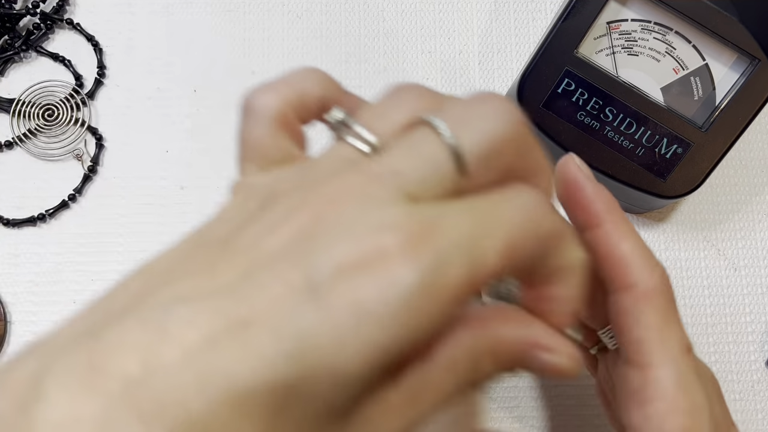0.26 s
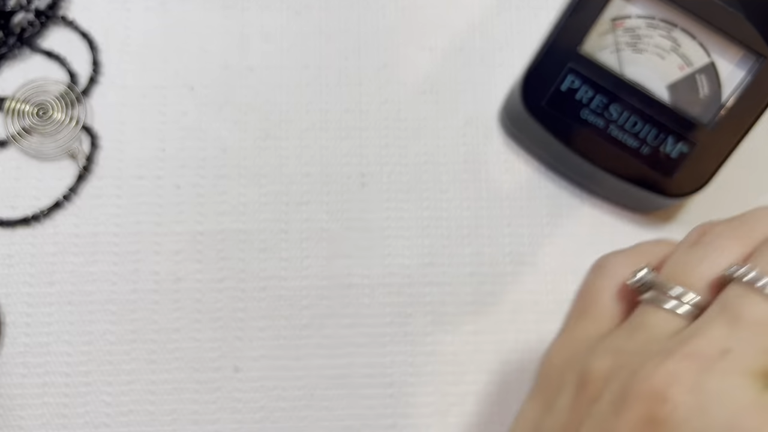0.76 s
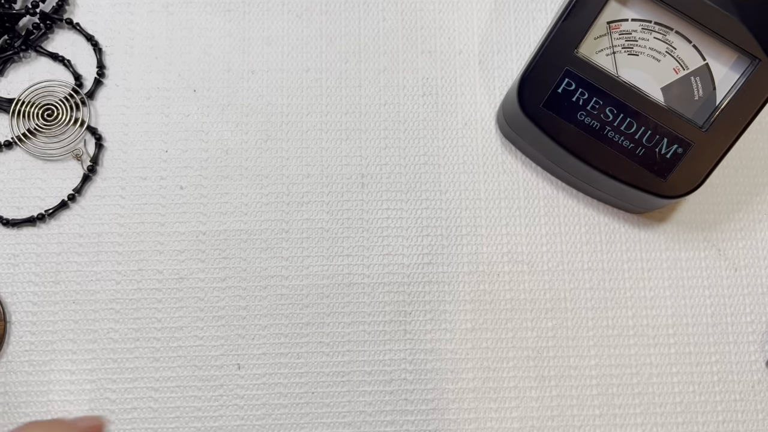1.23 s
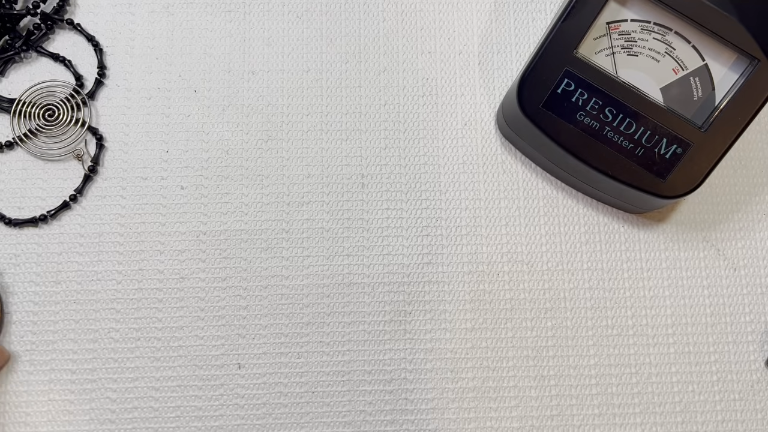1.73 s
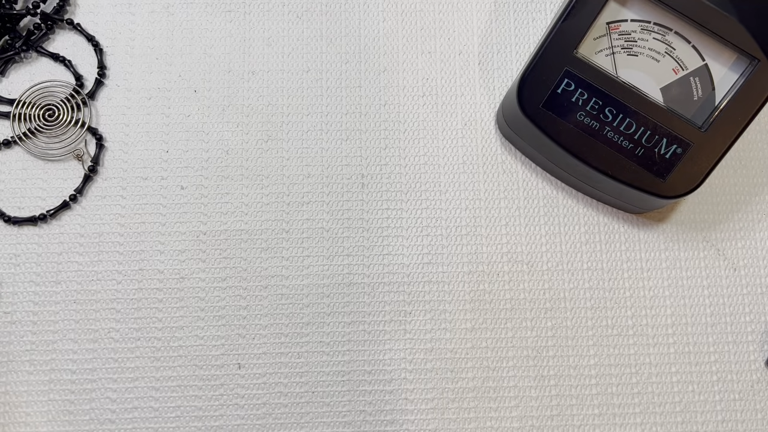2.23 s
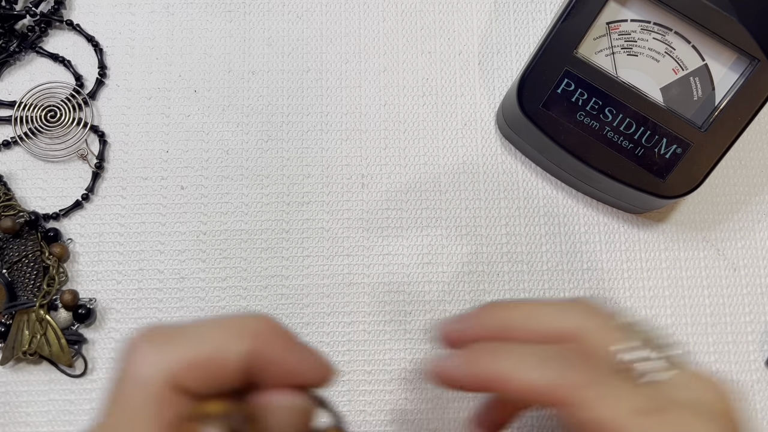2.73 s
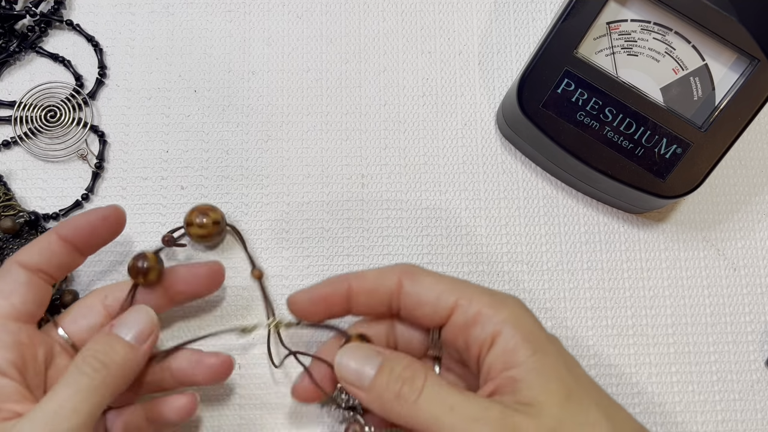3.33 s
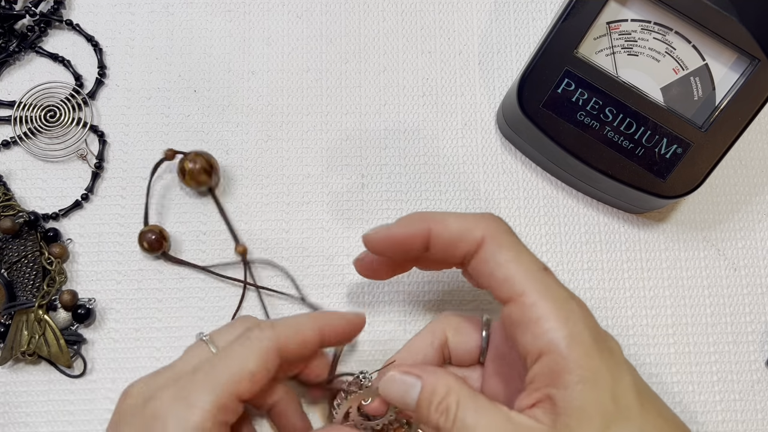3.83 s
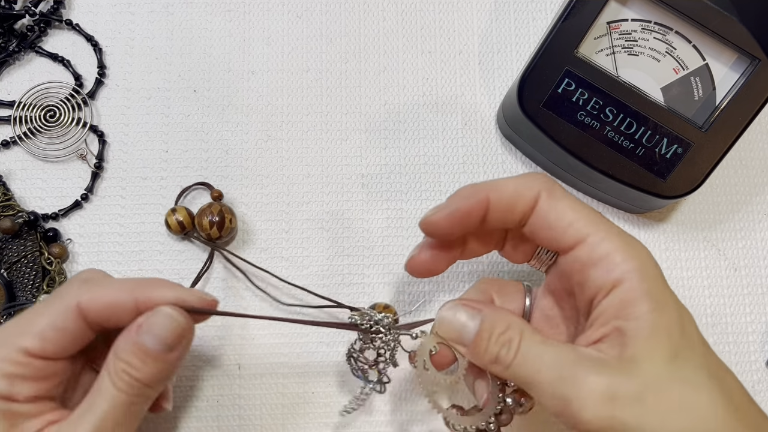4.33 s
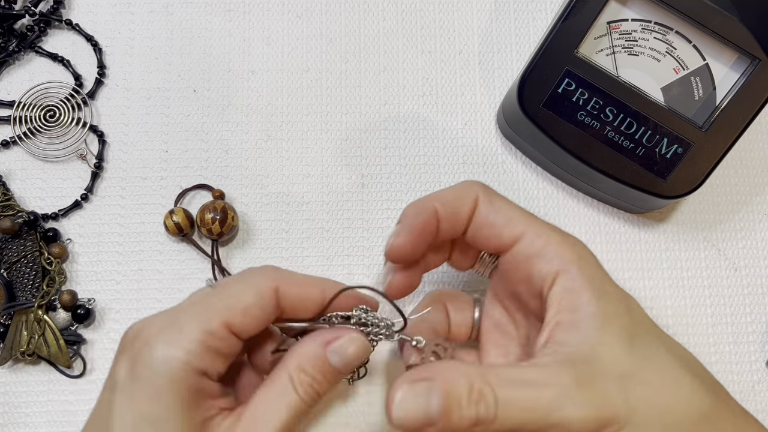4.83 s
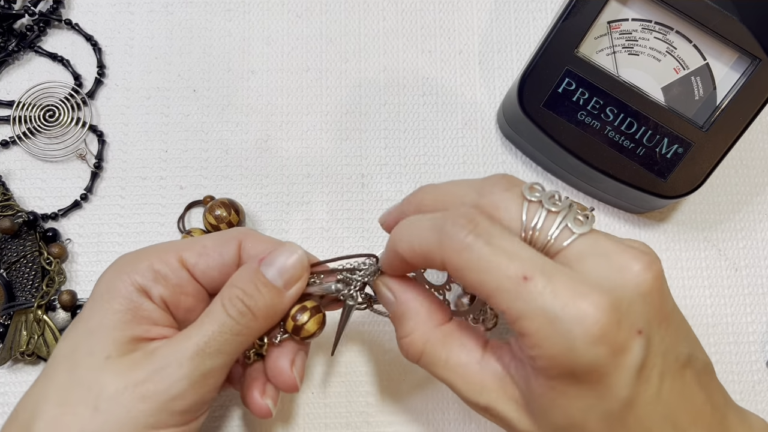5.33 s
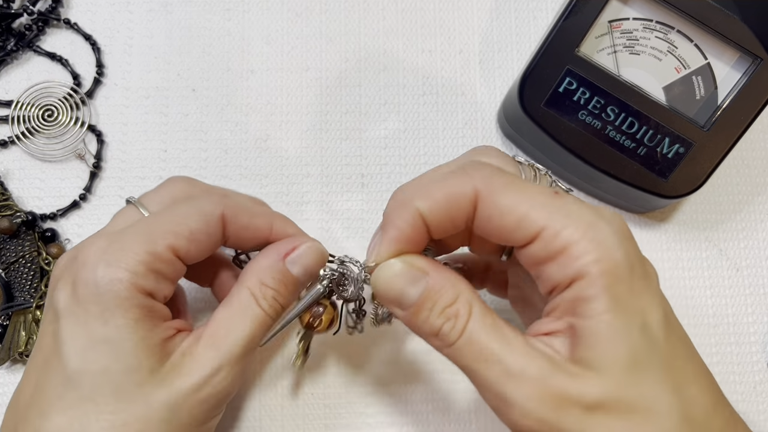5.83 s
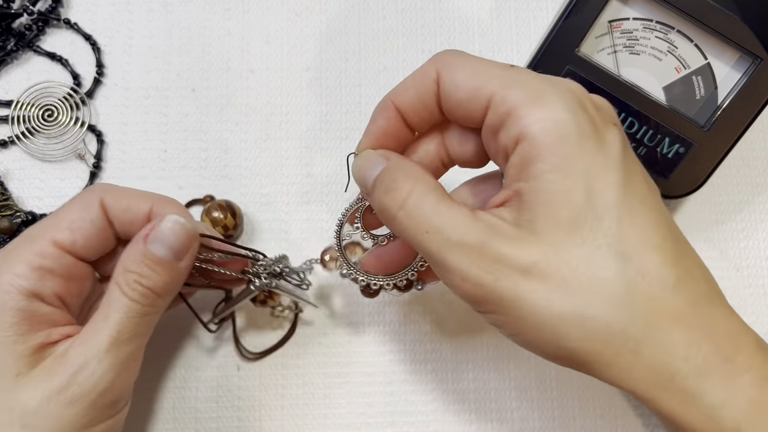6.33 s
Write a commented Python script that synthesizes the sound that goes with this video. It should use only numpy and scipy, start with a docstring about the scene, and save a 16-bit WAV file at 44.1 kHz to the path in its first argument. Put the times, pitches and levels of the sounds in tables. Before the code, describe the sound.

Jewellery chains jingle and rustle on a cloth-covered table, then beads knock and drag, followed by quiet fiddling with faint metallic clinks.

```python
"""A low, wavering drone and soft room noise come first, then jingling links and rustling cloth.
Hands lift a chain necklace away and put it down to one side of a cloth-covered table, heard close up.
A cord necklace with wooden beads is dragged in, and a metal earring is picked out with small clinks.
Noise bursts and fading tones make the blows and clinks; random tiny impacts make the jingling and rubbing.
A short echo, and two microphones that each tint the sound, place it all in a small quiet room."""
import sys
import numpy as np
from scipy import signal
from scipy.fft import rfft, irfft
from scipy.io import wavfile

SR = 44100
rng = np.random.default_rng(int(sys.argv[2]) if len(sys.argv) > 2 else 0)


def dump(signal):
    """Clip the signal to [-1, 1] and save it as 16-bit WAV at the path in sys.argv[1]."""
    limited = np.clip(np.atleast_2d(signal).T, -1, 1)
    pcm = np.round(limited * 32767).astype(np.int16)
    wavfile.write(sys.argv[1], SR, pcm)


N = 289737
TIME = np.arange(N) / SR  # s

# All levels are relative: mixing and the microphones still change them.
# room noise, how much of each pitch: [f/Hz, level/dB]
AIR_SPECTRUM = [(20, -21.5), (45, -2), (65, 0), (110, -6.5), (180, -3), (260, -24), (450, -30),
                (1000, -36.5), (3000, -35), (8000, -42.5), (16000, -50)]
AIR_DB = -66
# rise and fall of the low drone: [t/s, level/dB]
DRONE_LEVEL = [(0.0, -58.5), (0.7, -58.5), (1.3, -68.5), (2.0, -55), (3.4, -69.5), (6.57, -71.5)]
# each move of the hands shakes the links and rubs the cord: [t/s, length/s, jingle level/dB, rustle level/dB]
HAND_MOVES = [(0.129, 0.23, -50, -45.5), (0.326, 0.11, -45.5, -45.5), (0.607, 0.16, -43.5, -53.5),
              (0.864, 0.083, -50.5, -63), (1.188, .02, -53, -59), (1.71, .12, -50.5, -56),
              (1.835, 0.15, -40.5, -40.5), (2.061, 0.01, -49, -45), (2.202, 0.011, -34, -43),
              (2.258, 0.087, -56, -42.5), (2.463, 0.2, -49.5, -40.5), (2.633, 0.087, -43, -40.5),
              (2.764, 0.19, -51.5, -45), (3.004, 0.17, -55, -58.5), (3.29, 0.13, -55, -55.5),
              (3.443, 0.033, -51, -50), (3.58, 0.094, -60, -61), (3.763, .03, -53, -63.5),
              (3.835, 0.2, -51.5, -53), (4.108, 0.073, -58.5, -56), (4.51, 0.033, -63, -55),
              (4.603, 0.093, -62.5, -58), (4.82, 0.22, -58.5, -67.5), (5.158, 0.045, -60.5, -71),
              (5.48, 0.073, -57.5, -65), (5.66, 0.075, -56, -62.5), (5.975, 0.028, -46, -49),
              (6.08, 0.14, -62.5, -62), (6.297, 0.026, -60.5, -64), (6.56, 0.048, -45.5, -43)]
START_S, SETTLE_S = 0.036, 0.049  # time constants of a hand move building up and coming to rest
SLOWING_DB_PER_S = 16  # a movement weakens as it slows
# once the cord necklace is in hand it is never quite still
HELD_S, HELD_JINGLE_DB, HELD_RUSTLE_DB = 1.65, -72.5, -78
# colour of touching chain links: [f/Hz, level/dB]
LINK_SPECTRUM = [(1000, -38.5), (3000, -18.5), (4500, -28.5), (7000, -5.5), (8600, -0.5), (10400, 2.5),
                 (11600, 1), (12400, -1), (13300, -4), (14400, -3), (16000, -12)]
# ringing of charms and hooks: [f/Hz, level/dB, time to fall 60 dB/s]
CHARM_MODES = [(4034, 2, 0.023), (6050, -12.5, .04), (6700, 4, .04), (8230, -2.5, 0.13),
               (9750, -13.5, 0.0377), (12500, -30.5, .04), (11800, -5, 0.048), (14600, -4.5, 0.055),
               (13200, -9.5, .08), (12150, 1, 0.032), (14550, -2.5, .04), (14600, -2, .04)]
# colour of rubbing on cloth: [f/Hz, level/dB]
CLOTH_SPECTRUM = [(300, -17), (900, -16.5), (2000, -8), (3300, -9), (4600, -3.5), (5800, 0), (7200, -0.5),
                  (9000, -7.5), (16000, -20)]
# how long the room's echo lasts at each pitch: [f/Hz, time to fall 60 dB/s]
ROOM_DECAY = [(100, 1), (300, 0.18), (700, 0.19), (1500, 0.2), (4000, 0.083), (9000, 0.1), (16000, 0.061)]
# the heel of a hand slides over the cloth: [t/s, length/s, level/dB]
HAND_SLIDES = [(0.16, .12, -51), (1.8, 0.19, -53.5), (2.17, .04, -51), (2.63, 0.13, -56)]
# the clearest touches of metal on metal: [t/s, level/dB, centre f/Hz, left-right lean/dB before scaling]
METAL_TOUCHES = [(0.1674, -36, 12100, -9), (0.2027, -36, 11200, -4), (0.329, -33, 13600, 0),
                 (0.392, -34.5, 12200, -3), (0.5715, -37.5, 11200, -2), (0.715, -36, 11100, -5),
                 (0.8575, -38.5, 8600, -13), (0.9276, -38.5, 12700, 0), (1.196, -41, 9000, -16),
                 (1.659, -42, 9200, 0), (1.7307, -36.5, 8300, 0), (1.8472, -32, 9400, -2),
                 (1.8528, -29.5, 9350, 3), (1.906, -29.5, 8900, -3), (1.938, -32.5, 8600, 11),
                 (1.9974, -33.5, 7000, 8), (2.0828, -34, 9800, -5), (2.149, -38.5, 9400, 8),
                 (2.1918, -28.5, 11800, 9), (2.212, -22.5, 12900, 2), (2.227, -33, 12000, 6),
                 (2.291, -24, 7000, 1), (2.52, -24, 5760, -4), (2.677, -36, 11900, -2),
                 (2.8663, -33.5, 11100, 2), (2.956, -46, 10400, 1), (3.1018, -44, 12100, -4),
                 (3.2907, -41, 6700, 24), (3.433, -45, 12260, 1), (3.813, -45, 9450, 5),
                 (3.9867, -44, 9900, 10), (4.127, -49.5, 11800, -3), (4.8626, -48, 13640, 0),
                 (5.027, -50.5, 8900, 1), (5.0785, -54.5, 11600, 1.5), (5.271, -51, 11260, 3),
                 (5.375, -52, 11000, -4.5), (5.481, -50, 12900, -8.5), (5.5997, -48.5, 11600, -3),
                 (5.6487, -47.5, 13400, -4.5), (5.837, -52.5, 12100, 3), (5.954, -41, 7540, 5),
                 (6.0076, -35, 8150, 12), (6.0735, -44, 8200, -2), (6.104, -43, 12150, 3),
                 (6.301, -46, 12100, -10.5), (6.4843, -50.5, 12200, -3), (6.54, -37, 8700, 5)]
# hands and heavy beads landing softly on the cloth, and the deeper boom under some bead knocks: # [t/s, boom
# level/dB, thud level/dB]
LOW_THUMPS = [(0.1817, -51.5, -56), (0.2694, -50.5, -49.5), (1.97, -54, -63.5), (2.2235, -57, -53),
              (2.324, -51.5, -45), (2.6787, -51, -63), (2.8836, -47.5, -55.5), (3.293, -37.5, -52),
              (3.3597, -44, -40.5), (3.4646, -45, -44.5), (5.975, -52.5, -56), (6.5263, -51, -45.5),
              (6.5464, -52, -44)]
# ringing of the whole table: [f/Hz, level/dB, time to fall 60 dB/s, phase between the microphones/rad]
FRAME_MODES = [(85, -4.5, .14, 0), (107.2, 0.5, 0.17, 0), (181.7, 0, .12, 0.0081), (241.8, 1, 0.092, 0)]
# low ringing of the table top, same columns: [f/Hz, level/dB, time to fall 60 dB/s, phase/rad]
LOW_TOP_MODES = [(350.5, -20, 0.15, 0.42), (426.6, -6.5, 0.14, 0.16), (495.5, -8, 0.045, 0.88),
                 (609, -2.5, 0.032, 2.1), (747.4, -9, 0.06, 2.52)]
# high ringing of the table top, same columns: [f/Hz, level/dB, time to fall 60 dB/s, phase/rad]
HIGH_TOP_MODES = [(781, 6.5, 0.02, -6), (906, 3.5, 0.079, 2.0), (1135, 5, 0.04, 2), (1401, -2, 0.16, -1.7),
                  (1490, -15, 0.13, -0.5), (1737, -13, .05, -3), (1910, -1.5, 0.024, -4.5),
                  (2297, 11, .03, 1.26), (2440, -5.5, 0.16, 1), (2690, 7, 0.037, 3.5),
                  (3388, 3, 0.026, 2.6), (3930, -1, 0.033, -2.5), (5050, -4.5, 0.02, 2.5),
                  (5580, 0.5, 0.031, 4)]
# hard beads striking the table:
# [t/s, thud level/dB, clack level/dB, clack centre f/Hz, left-right lean/dB before scaling]
BEAD_KNOCKS = [(0.4031, -85, -38, 5050, 0), (0.578, -88, -48.5, 4400, -14), (0.713, -95, -47, 4600, -21),
               (0.7633, -94, -45, 5060, -7), (1.7053, -57, -45.5, 3320, 5), (1.7403, -50, -34.5, 3200, 3),
               (1.8119, -54, -36.5, 3050, -1), (1.8467, -58, -32.5, 4860, -5),
               (1.8627, -50.5, -32.5, 3660, -1), (1.9192, -37.5, -32, 2540, -17),
               (1.9354, -33, -31, 2800, -11), (1.9414, -32.5, -33.5, 2290, 23), (1.9699, -45, -41, 2510, 5),
               (2.0157, -39, -34, 1380, -2), (2.037, -42.5, -47, 1750, -5), (2.1682, -48, -43.5, 1730, -11),
               (2.2916, -43, -28, 3800, -9), (2.3246, -47, -34.5, 3850, 16),
               (2.3453, -45.5, -39.5, 3160, 6), (2.4734, -54, -35, 3950, 4), (2.499, -48.5, -33.5, 2900, 6),
               (2.5204, -47.5, -25.5, 3830, 6), (2.57, -55, -31, 4180, 1), (2.5921, -46.5, -31, 3650, 6),
               (2.6128, -56, -32.5, 3180, 9), (2.6781, -43, -41, 4400, 18), (2.7041, -49, -37, 3400, 10),
               (2.7966, -53.5, -40.5, 4450, 16), (3.0366, -69.5, -43.5, 4900, -3),
               (3.2929, -25.5, -27.5, 1560, -1), (3.3473, -63.5, -44.5, 2690, 2),
               (3.8322, -57.5, -40, 3700, 0), (3.8684, -49.5, -47.5, 3480, -6),
               (3.9348, -56.5, -48, 2300, 2), (4.3129, -53.5, -40.5, 2510, 1), (4.4265, -70, -53, 2070, -3),
               (4.5144, -54.5, -48, 2560, -3), (4.5928, -48.5, -44, 1530, -8),
               (4.6117, -44, -34.5, 2980, 2), (4.6291, -50, -38.5, 2340, 0), (4.6529, -54, -46, 2830, 5),
               (4.7012, -54, -49.5, 1830, -2), (4.7406, -49, -42, 3140, 7), (4.7639, -52, -37, 2350, -1),
               (4.7751, -51, -36, 3200, 3), (4.8769, -55, -44.5, 2280, 2), (5.969, -37, -42.5, 1950, -3),
               (5.9836, -40.5, -45.5, 1300, 4)]
# the chain put down on a hard surface further off:
# [t/s, thud level/dB, clack level/dB, clack centre f/Hz, left-right lean/dB before scaling]
CHAIN_SET_DOWN = [(1.366, -69.5, -57.5, 2970, 6), (1.4074, -37.5, -23, 2640, -6.5),
                  (1.4145, -51.5, -42.5, 1640, -4.5), (1.422, -55, -32.5, 1140, -4),
                  (1.473, -47, -43, 1580, -10.5), (1.507, -51.5, -47.5, 1820, -5)]
BOOM_DB = -18.5  # boom of the table, relative to the thud of a knock
# two pushes move something aside to make room: [t/s, length/s, level/dB]
PUSHES = [(1.112, 0.035, -38), (1.183, 0.063, -38.5)]
# colour of the scrape: [f/Hz, level/dB]
SCRAPE_SPECTRUM = [(80, -18), (200, -4.5), (450, 3.5), (600, 1), (1100, -9.5), (1700, -8.5), (2400, -9),
                   (3200, -15), (6500, -18), (12000, -37)]
# beads dragged over the table: [t/s, length/s, level/dB]
BEAD_DRAGS = [(1.78, 0.32, -46.5), (2.24, 0.14, -43), (2.5, 0.21, -41.5), (2.74, 0.13, -56.5),
              (3.95, 0.077, -58.5), (4.66, 0.32, -60)]
# colour of the dragging: [f/Hz, level/dB]
DRAG_SPECTRUM = [(60, -6), (110, 5.5), (280, 0.5), (440, 9.5), (800, 0), (1300, -2.5), (2400, -1),
                 (4200, 2), (6500, -12.5), (12000, -46)]
# the cord slips through a hollow bead: [t/s, length/s, level/dB]
CORD_SLIPS = [(3.865, 0.022, -50), (4.29, .025, -53), (4.435, 0.05, -57.5), (4.6, 0.068, -57),
              (4.89, .02, -56), (4.978, 0.014, -57.5)]
# resonances of the hollow bead: [f/Hz, level/dB, time to fall 60 dB/s]
BORE_MODES = [(2270, 6, 0.0091), (4050, -15, 0.011)]
# the earring's wire hook springs free and rings: [t/s, level/dB]
HOOK_PINGS = [(4.625, -63), (4.818, -59), (4.864, -59), (4.89, -55), (4.985, -63), (5.03, -65),
              (5.21, -59.5), (6.01, -61)]
# colour shared by both microphones: [f/Hz, level/dB]
MIC_SPECTRUM = [(100, -2), (6800, -2), (7600, -6.5), (8600, -4), (9600, -8.5), (10500, -13), (11700, 3),
                (16000, 4.5)]
# difference between the microphones: [f/Hz, left minus right/dB]
MIC_BALANCE = [(100, 2.5), (450, 0.5), (1500, 2.5), (3000, 1), (4500, 6.5), (6500, 6), (9000, 1),
               (16000, -0.5)]
LAG = 10  # samples by which sound from the hands reaches the left microphone later
EDGE_HZ = 16100  # top of the band that is kept


def amp(db):
    """Turns decibels into a plain multiplier."""
    return 10 ** (np.asarray(db) / 20)


def unit(x, span=None):
    """Scales to an average strength (rms) of 1, over the first span seconds if given."""
    head = x if span is None else x[..., :int(span * SR)]
    return x / np.sqrt(np.mean(head ** 2) + 1e-24)


def read(points, hz):
    """Reads a curve at the pitches hz, joining its points along a log pitch axis."""
    f, value = np.transpose(points)
    return np.interp(np.log(hz + 1), np.log(f + 1), value)


def level(rows):
    """Turns a dB curve over time into a multiplier for every sample."""
    return amp(np.interp(TIME, *np.transpose(rows)))


def add(mix, s, sound):
    """Mixes a sound in, starting at s seconds."""
    part = mix[:, max(round(s * SR), 0):][:, :sound.shape[1]]
    part += sound[:, :part.shape[1]]


def convolve(x, response):
    """Starts a copy of the response at every sample of x and sums them, cut to the length of x."""
    full = signal.fftconvolve(np.atleast_2d(x), np.atleast_2d(response), axes=1)
    return full[:, :x.shape[-1]]


def colour(x, points, size=2048):
    """Tints a sound with a spectrum, using a filter that never answers before its input."""
    hz = abs(np.fft.fftfreq(size, 1 / SR))
    log_gain = np.log(amp(read(points, hz)))
    spectrum = np.exp(np.conj(signal.hilbert(log_gain)))  # minimum phase
    return convolve(x, np.fft.ifft(spectrum).real[:size // 2])


def hump(centre_hz, below_db, above_db):
    """A broad hump of pitch: it falls this many dB in the first octave each way, then more steeply."""
    octaves = np.arange(-8, 7) / 2
    slope = np.where(octaves < 0, below_db, above_db)
    fall = slope * abs(octaves) ** 1.5
    return np.transpose([centre_hz * 2 ** octaves, -np.minimum(fall, 70)])


def decay(t, t60):
    """Smooth dying away, by 60 dB in t60 seconds."""
    return np.exp(-np.log(1000) * t / t60)


def onset(t, rise_s):
    """The contact builds up over a moment."""
    return 1 - np.exp(-t / rise_s)


def panned(x, db):
    """Makes the left side louder than the right by db."""
    return x * amp([[db / 2], [-db / 2]])


def from_hands(x, spread):
    """Sound reaches the left microphone later; scatter off hands and table differs at each."""
    t = np.arange(SR // 100) / SR
    scatter = unit(rng.standard_normal((2, len(t))) * decay(t, 0.047))
    paths = spread * scatter / np.sqrt(len(t))
    paths[0, LAG] += 1  # direct sound, left
    paths[1, 0] += 1  # direct sound, right
    return convolve(x, paths)


def contacts(per_s, spread_db):
    """A random train of tiny impacts of uneven size, pushing either way."""
    size = amp(spread_db * np.minimum(rng.exponential(1, N), 4)) * rng.choice([-1, 1], N)
    return size * (rng.random(N) < per_s / SR)


def stroke(s, length_s, db, start_s, settle_s):
    """The gain of one movement: it builds up before s, weakens a little as it goes, and comes to rest."""
    t = TIME - s
    outside = np.minimum(t, 0) / start_s - np.maximum(t - length_s, 0) / settle_s
    steady = amp(db - SLOWING_DB_PER_S * np.clip(t, 0, length_s))
    return steady * np.exp(np.maximum(outside, -20))


def motion(rows, start_s, settle_s):
    """The gain of a series of movements; the strongest one leads at each moment."""
    strokes = [stroke(s, length_s, db, start_s, settle_s) for s, length_s, db in rows]
    return np.max(strokes, axis=0)


def background(drone_hz=56.0, drone_db=-2):
    """Low room noise, nearly the same on both sides, and a drone whose pitch wavers at random."""
    common, left, right = rng.standard_normal((3, N))
    apart = colour(np.array([left, right]), [(150, -14), (300, -9), (700, 3), (16000, 3)])
    air = unit(colour(common + apart, AIR_SPECTRUM, size=8192))
    waver = np.interp(TIME, np.linspace(0, TIME[-1], 40), rng.standard_normal(40))
    wavering_hz = drone_hz + 0.766 * waver
    drone = np.sqrt(2) * np.sin(2 * np.pi * np.cumsum(wavering_hz) / SR)
    return amp(AIR_DB) * air + amp(drone_db) * drone * level(DRONE_LEVEL)


def handling(held_db, axis, uneven_db=2.0, catches_per_s=70):
    """How hard the hands stir the links (column 2) or the cord (column 3); both catch and slip unevenly."""
    moves = motion([(row[0], row[1], row[axis]) for row in HAND_MOVES], START_S, SETTLE_S)
    catches = np.interp(TIME * catches_per_s, np.arange(2000), rng.standard_normal(2000))
    held = amp(held_db) * (TIME > HELD_S)
    return np.maximum(moves, held) * unit(amp(uneven_db * catches))


def charm_ring(t, vary_db):
    """A small metal part rings on several notes: each one favours different notes, slightly detuned."""
    hz, db, t60 = np.transpose(CHARM_MODES)[:, :, None]
    strength, detune = rng.standard_normal((2, len(CHARM_MODES), 1))
    notes = np.sin(2 * np.pi * hz * (1 + .008 * detune) * t)
    return (amp(db + vary_db * strength) * decay(t, t60) * notes).sum(0)


def jingle(gain_db=0.5, ring_db=-17, count=24):
    """Chain links tumble against each other, each with its own tick, ring and scatter."""
    out, t = np.zeros((2, N)), np.arange(SR // 12) / SR
    shake = handling(HELD_JINGLE_DB, axis=2)
    for _ in range(count):
        tick = unit(rng.standard_normal(len(t)) * decay(t, 0.0095), 0.003)
        ring = unit(charm_ring(t, vary_db=1.0), 0.012)
        link = colour(tick + amp(ring_db) * ring, LINK_SPECTRUM)
        link = unit(from_hands(link, spread=.5))
        out += convolve(contacts(per_s=1000 / count, spread_db=5.5) * shake, link)
    return amp(gain_db) * unit(out) * np.sqrt(np.mean(shake ** 2))


def rustle(gain_db=1.5, ring_db=-8, count=24):
    """Cord and beads catch on the woven cloth: many small slips, each with a brief pitch of its own."""
    out, t = np.zeros((2, N)), np.arange(SR // 25) / SR
    for hz in np.geomspace(2600, 9000, count):
        snap = unit(rng.standard_normal(len(t)) * decay(t, 0.0055))
        note = unit(np.sin(2 * np.pi * hz * t) * decay(t, .018))
        slip = from_hands(colour(snap + amp(ring_db) * note, CLOTH_SPECTRUM), spread=1.5)
        out += convolve(contacts(per_s=1600 / count, spread_db=4.5), slip)
    return amp(gain_db) * unit(out) * handling(HELD_RUSTLE_DB, axis=3)


def room(x):
    """A small furnished room: blurred reflections that die away at a different speed for each pitch."""
    hz, t, z = signal.stft(rng.standard_normal((2, SR // 2)), SR, nperseg=256)
    fading = z * decay(t, read(ROOM_DECAY, hz)[:, None])
    tail = signal.istft(fading, SR, nperseg=256)[1]
    tail *= np.clip((TIME[:tail.shape[1]] - .003) / 0.0018, 0, 1)  # silent for the first 3 ms
    return convolve(x, tail / np.linalg.norm(tail[0]))


def slides(rumble_hz=105):
    """A soft hand on the table gives only a low, lumpy rumble."""
    slips = colour(contacts(per_s=300, spread_db=4.5), hump(rumble_hz, below_db=20, above_db=11.5))
    return unit(slips) * motion(HAND_SLIDES, start_s=0.0183, settle_s=0.059)


def clinks(tick_t60=.011, ring_db=-12, rise_s=0.0017):
    """A tick of metal on metal, a chatter of tiny rebounds, then a thin ring."""
    out, t = np.zeros((2, N)), np.arange(SR // 8) / SR
    for s, db, hz, pan_db in METAL_TOUCHES:
        force = onset(t, rise_s) * (decay(t, tick_t60) + amp(-17) * decay(t, .045))
        tick = unit(force * rng.standard_normal(len(t)), 0.0061)
        ring = unit(charm_ring(t, vary_db=11.5), 0.0046)
        clink = colour(tick + amp(ring_db) * ring, hump(hz, below_db=8, above_db=22.0))
        heard = unit(from_hands(clink, spread=.45), 0.0015)
        add(out, s, amp(db) * panned(heard, 0.52 * pan_db))
    return out


def table_ring(modes, t, vary_db):
    """The table's own notes, each stirred more or less by where the blow lands (a random draw)."""
    hz, db, t60, phase = np.transpose(modes)[:, :, None]
    start = rng.uniform(0, 2 * np.pi, db.shape)
    strength = amp(db + vary_db * rng.standard_normal(db.shape))
    size = strength * decay(t, t60) * onset(t, 0.00025)
    angle = 2 * np.pi * hz * t + start
    return np.array([(size * np.sin(angle + side * phase / 2)).sum(0) for side in (1, -1)])


def table_thump(t, boom_db, thud_db):
    """The low answer of the table to a blow: a thud of the top over the boom of the frame."""
    thud = unit(table_ring(LOW_TOP_MODES, t, vary_db=1.0) * onset(t, 0.00078), 0.014)
    boom = unit(table_ring(FRAME_MODES, t, vary_db=1) * onset(t, .004), .03)
    return amp(boom_db) * boom + amp(thud_db) * thud


def bumps():
    """Soft landings, and some of the bead blows, shake the table with a low boom and thud; these add no clack
    of their own."""
    out, t = np.zeros((2, N)), np.arange(SR // 5) / SR
    for s, boom_db, thud_db in LOW_THUMPS:
        add(out, s, table_thump(t, boom_db, thud_db))
    return out


def knocks(rows, crack_t60, rattle_db, rattle_t60, ring_db, rise_s):
    """Each blow is a crack, a short rattle and a ring of the table top, over a low thud and boom."""
    out, t = np.zeros((2, N)), np.arange(SR // 5) / SR
    for s, thud_db, clack_db, hz, pan_db in rows:
        weight = np.minimum(2300 / hz, 1)  # duller blows come from heavier beads: slower contact, more ring
        fading = decay(t, crack_t60) + amp(rattle_db) * decay(t, rattle_t60)
        force = onset(t, rise_s * weight) * fading
        crack = unit(force * rng.standard_normal((2, len(t))), 0.0047)
        ring = unit(table_ring(HIGH_TOP_MODES, t, vary_db=4.0) * onset(t, 0.0018), 0.0083)
        body = weight * amp(ring_db) * ring
        clack = unit(colour(crack + body, hump(hz, below_db=4.5, above_db=9.5)), 0.002)
        thump = table_thump(t, thud_db + BOOM_DB, thud_db)
        add(out, s, thump + amp(clack_db) * panned(clack, 0.35 * pan_db))
    return out


def friction(spectrum, per_s, spread_db):
    """Dense small slips, heard differently at each microphone."""
    slips = np.array([contacts(per_s, spread_db) for _ in range(2)])
    return unit(colour(slips, spectrum))


def shove(ring_db=-4):
    """A short dull scrape along the edge of the table, which rings with it."""
    slips = friction(SCRAPE_SPECTRUM, per_s=900, spread_db=-3)
    modes = LOW_TOP_MODES + HIGH_TOP_MODES
    ring = unit(convolve(slips, table_ring(modes, TIME[:SR // 10], vary_db=1)))
    return unit(slips + amp(ring_db) * ring) * motion(PUSHES, start_s=0.0043, settle_s=0.017)


def drag(gain_db=1, ring_db=-3):
    """Beads bump across the weave and keep the table top ringing."""
    jolts = friction(DRAG_SPECTRUM, per_s=770, spread_db=4.5)
    ring = unit(convolve(jolts, table_ring(HIGH_TOP_MODES, TIME[:SR // 10], vary_db=1.5)))
    moving = motion(BEAD_DRAGS, start_s=0.061, settle_s=0.031)
    return amp(gain_db) * unit(jolts + amp(ring_db) * ring) * moving


def threading():
    """Quick slips of the cord make the hollow of a bead ring briefly."""
    t = TIME[:SR // 20]
    bore = sum(amp(db) * decay(t, t60) * np.sin(2 * np.pi * hz * t) for hz, db, t60 in BORE_MODES)
    rasp = from_hands(convolve(contacts(per_s=830, spread_db=2.0), bore), spread=1.0)
    return unit(rasp) * motion(CORD_SLIPS, start_s=0.013, settle_s=0.012)


def pings(hook_hz=13640, t60=0.083):
    """The thin hook rings on one high note."""
    out, t = np.zeros((2, N)), np.arange(SR // 4) / SR
    for s, db in HOOK_PINGS:
        note = np.sin(2 * np.pi * hook_hz * t) * onset(t, 0.00085) * decay(t, t60)
        add(out, s, amp(db) * unit(from_hands(note, spread=0.27), 0.0089))
    return out


def scene():
    """Close sounds carry little echo, those to the side more; low rumble comes through the table itself."""
    metal = jingle() + clinks() + pings()
    cloth = rustle()
    beads = knocks(BEAD_KNOCKS, crack_t60=0.061, rattle_db=-3.5, rattle_t60=.09, ring_db=-7.5, rise_s=0.0011)
    wood = beads + drag() + threading()
    chain = knocks(CHAIN_SET_DOWN, crack_t60=0.011, rattle_db=-23.0, rattle_t60=0.14,
                   ring_db=-22.0, rise_s=0.0038)
    aside = chain + shove()
    echo = room(amp(-14) * wood + amp(-10.5) * aside + amp(-11) * (metal + cloth))
    rumble = slides() + bumps()
    return background() + metal + cloth + wood + aside + echo + rumble


def record(dry):
    """The two microphones each tint the sound, then the highest treble is cut off."""
    hz = np.fft.rfftfreq(N, 1 / SR)
    gain = amp(read(MIC_SPECTRUM, hz) + np.array([[.5], [-.5]]) * read(MIC_BALANCE, hz))
    heard = irfft(rfft(dry) * gain, N)
    low_pass = signal.firwin(301, EDGE_HZ, window=("kaiser", 8), fs=SR)
    return signal.oaconvolve(heard, low_pass[None], "same")


dry = scene()
out = record(dry)
dump(out)
```